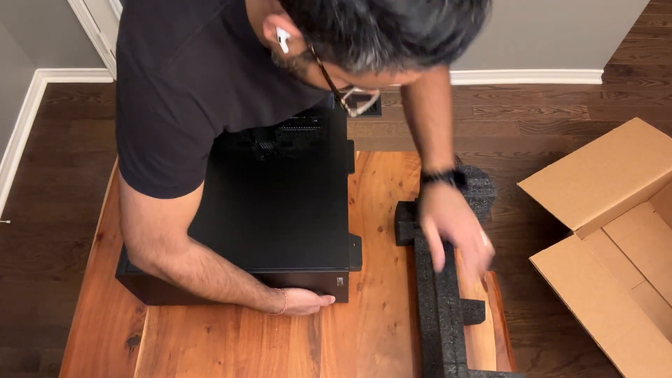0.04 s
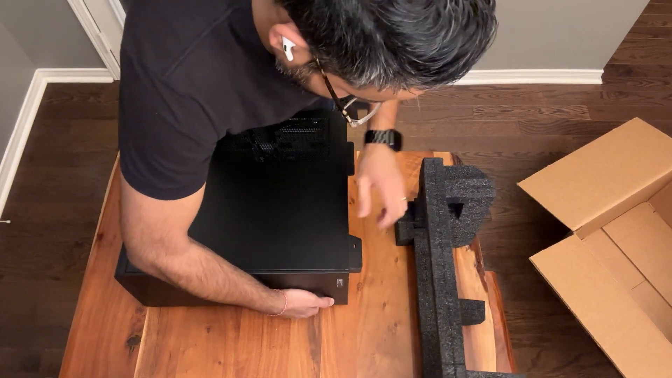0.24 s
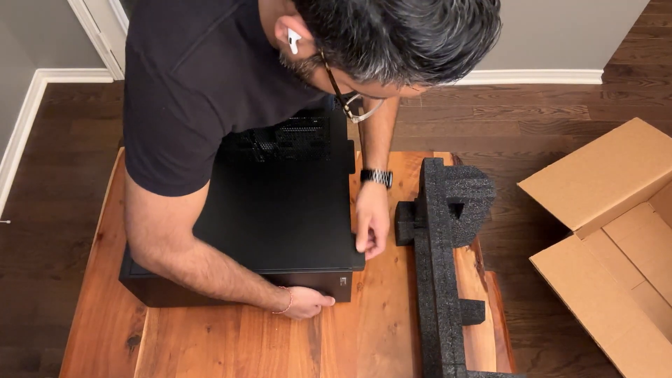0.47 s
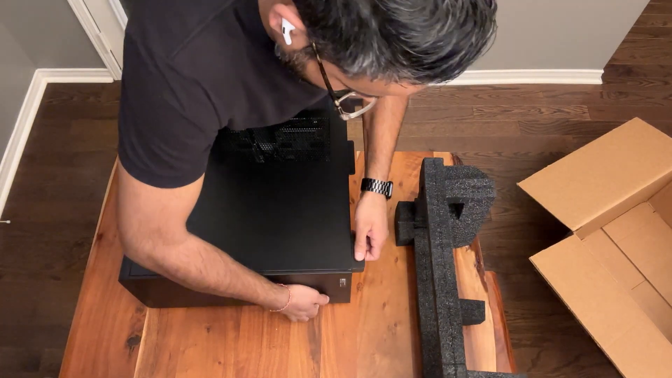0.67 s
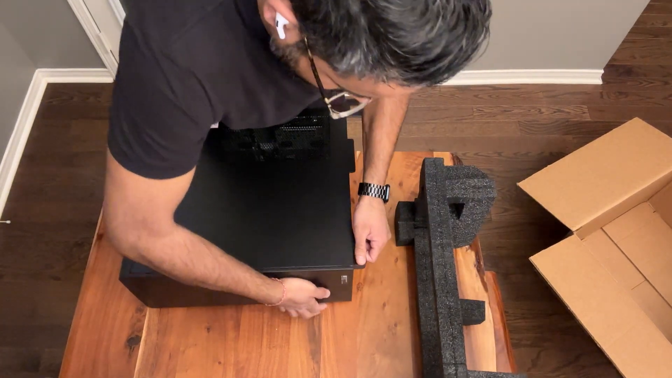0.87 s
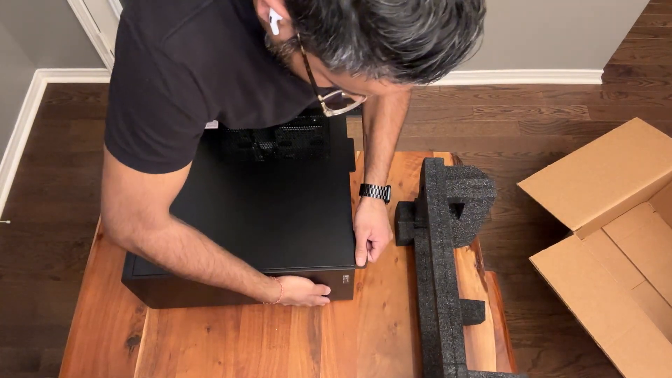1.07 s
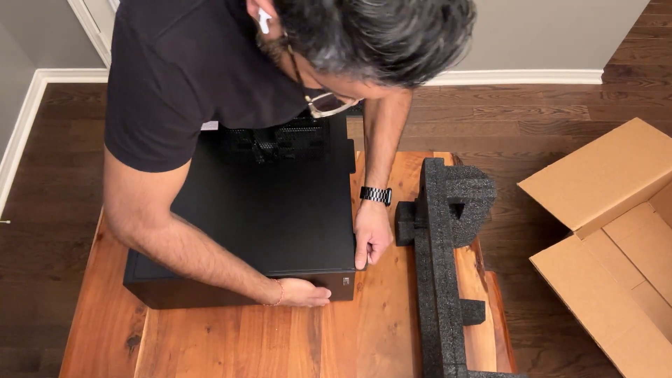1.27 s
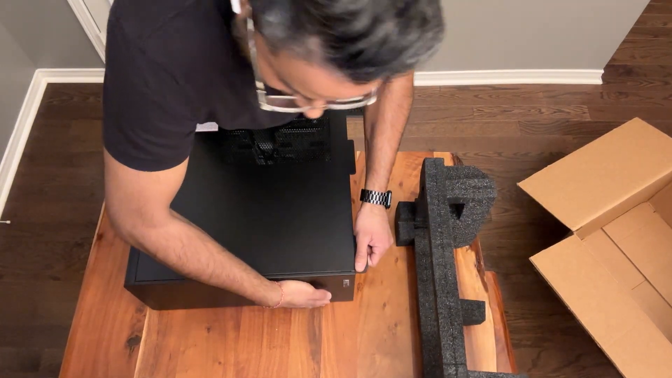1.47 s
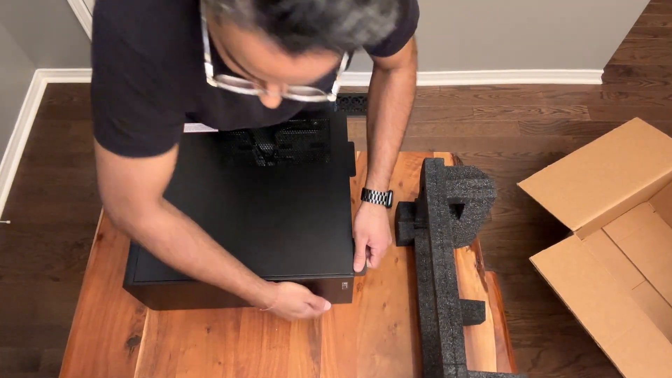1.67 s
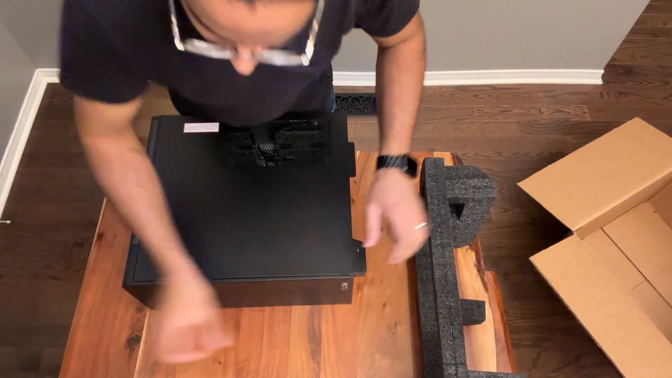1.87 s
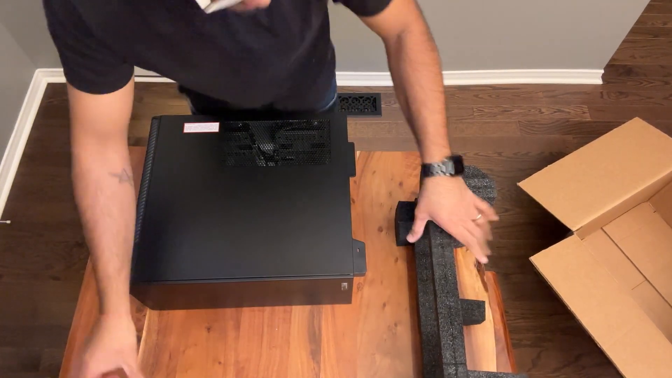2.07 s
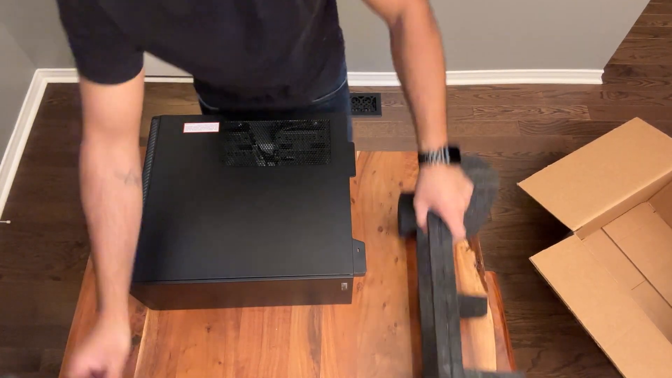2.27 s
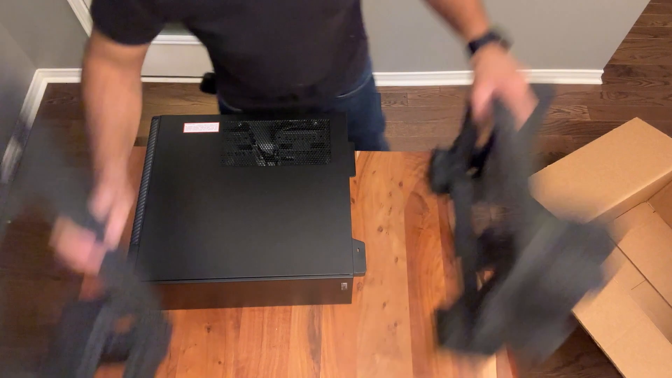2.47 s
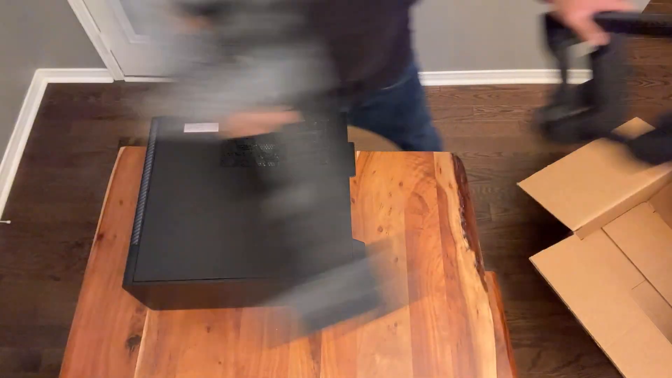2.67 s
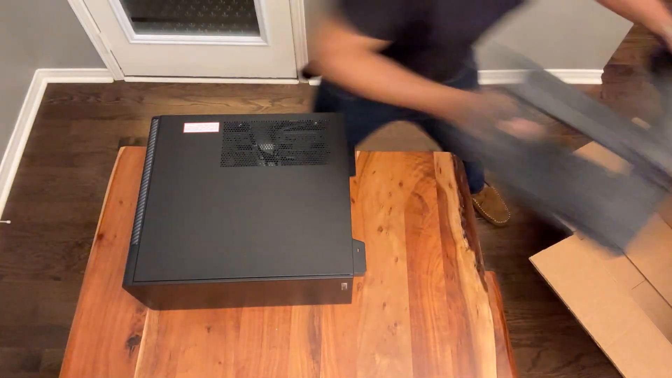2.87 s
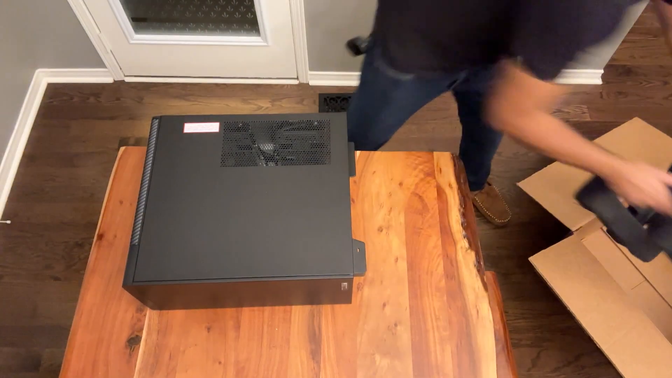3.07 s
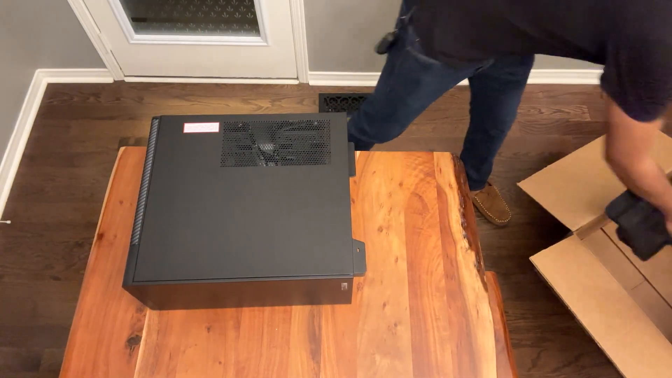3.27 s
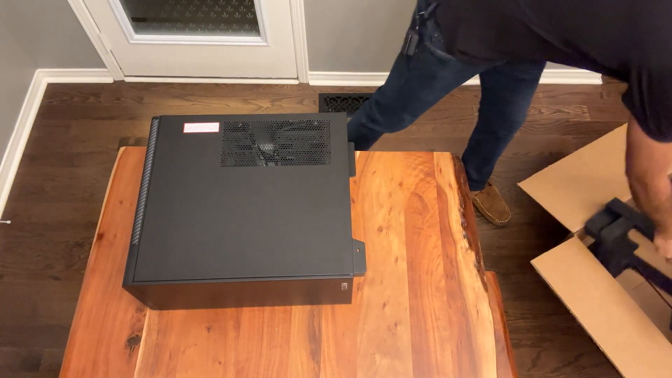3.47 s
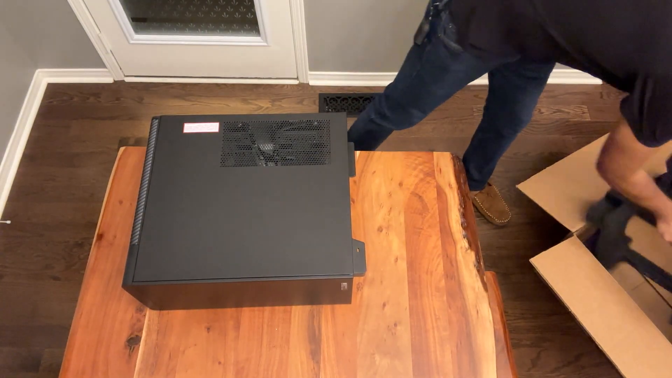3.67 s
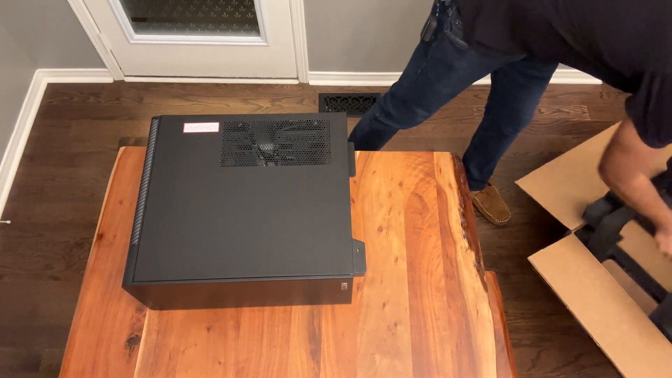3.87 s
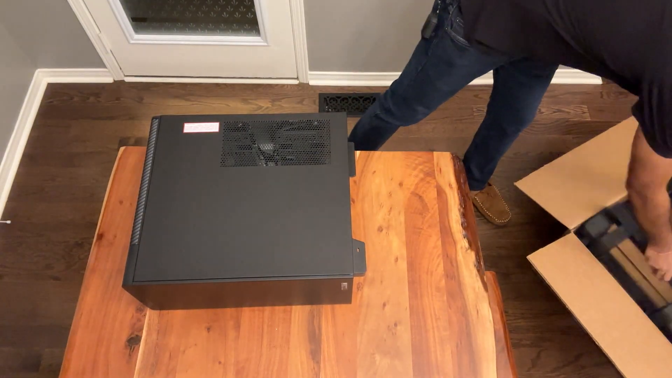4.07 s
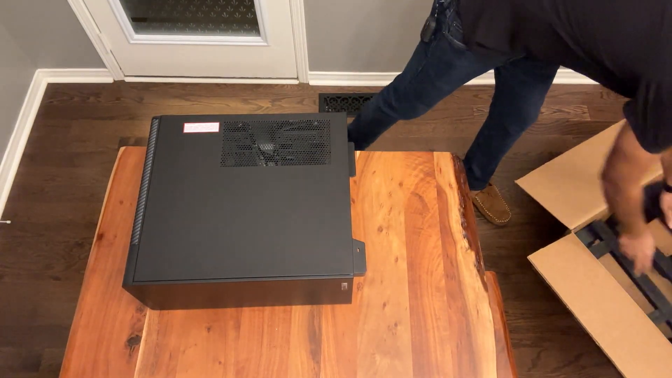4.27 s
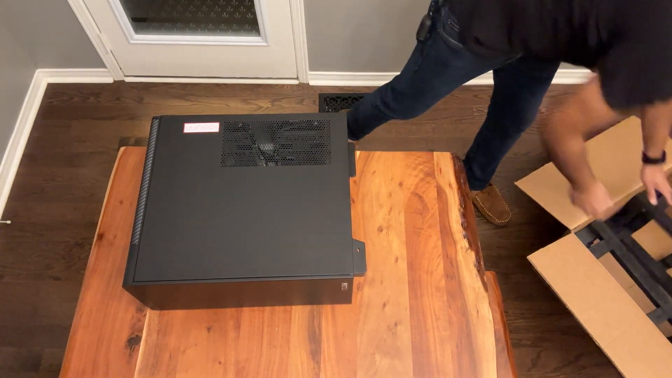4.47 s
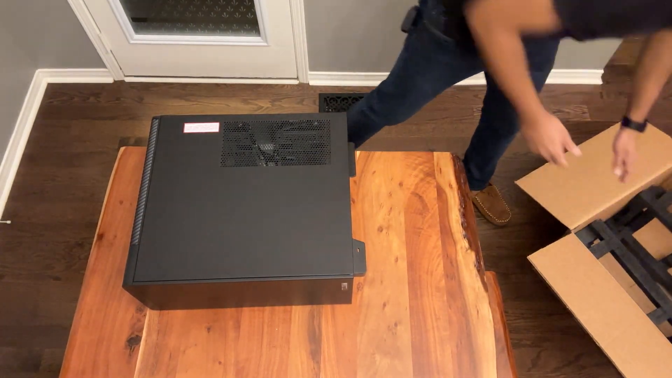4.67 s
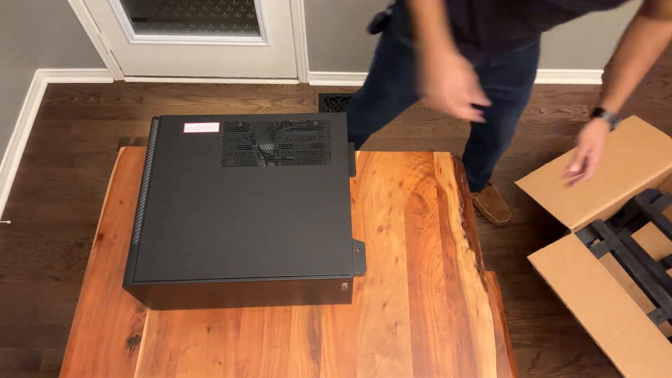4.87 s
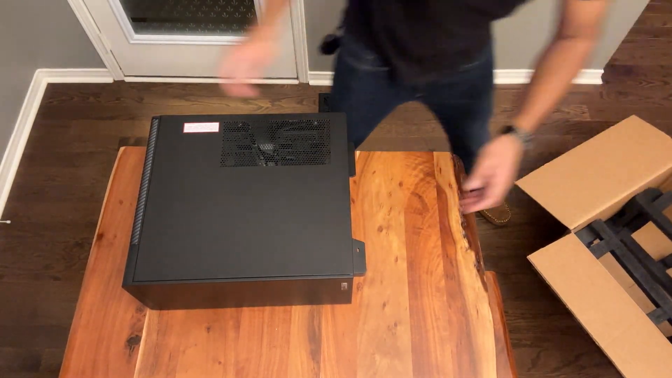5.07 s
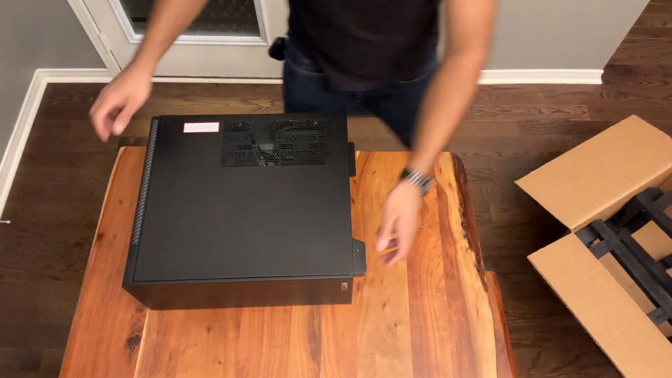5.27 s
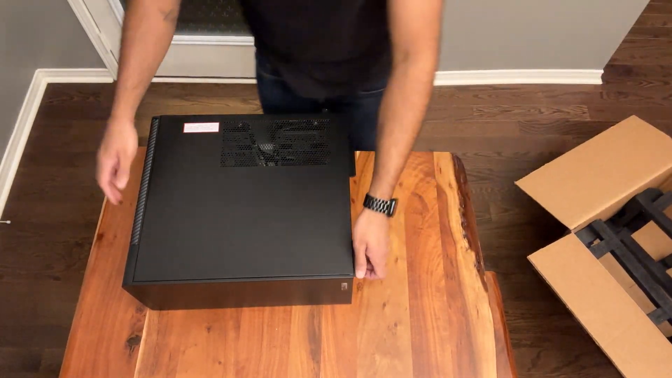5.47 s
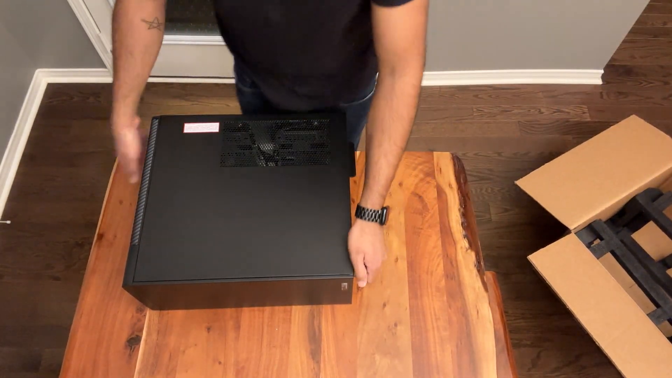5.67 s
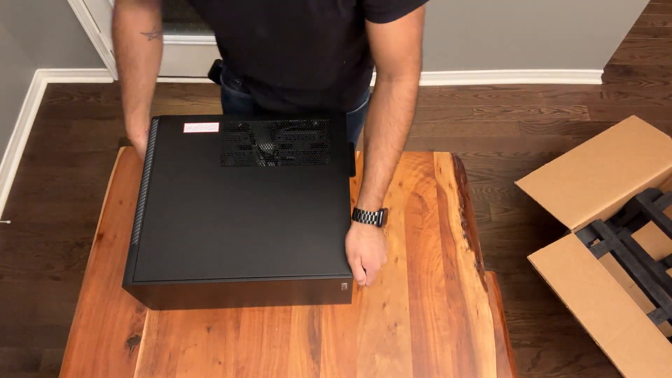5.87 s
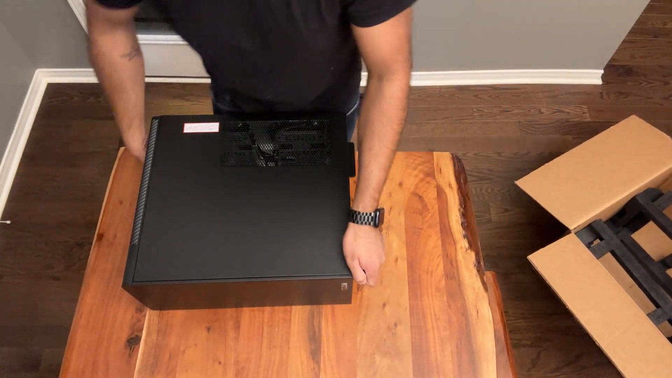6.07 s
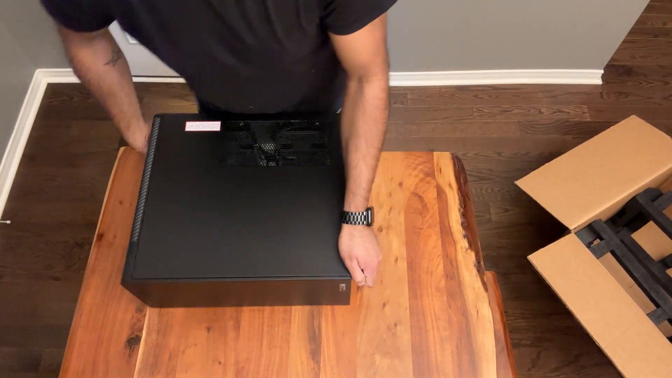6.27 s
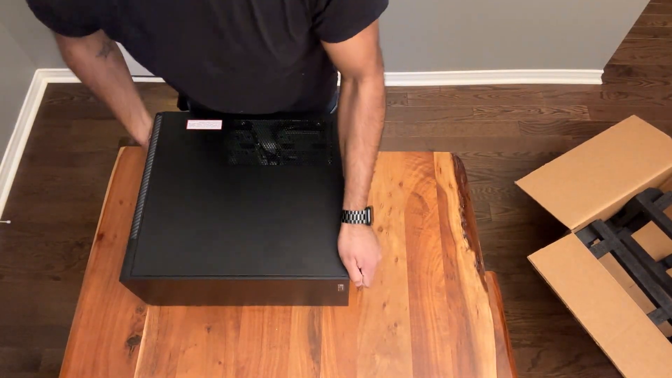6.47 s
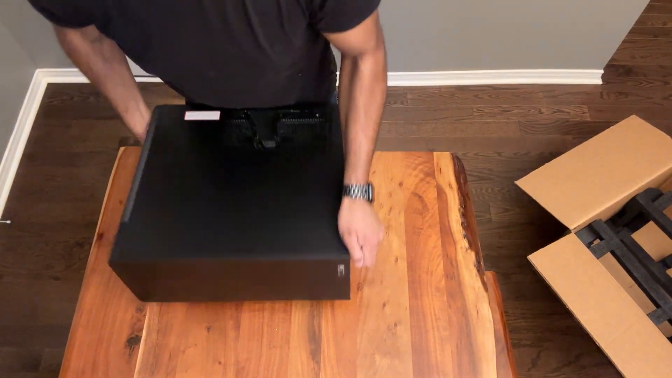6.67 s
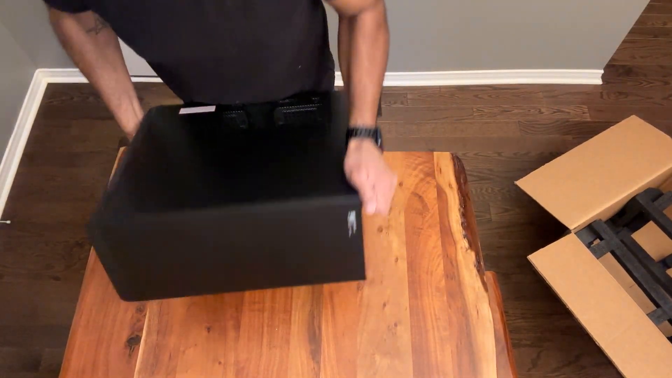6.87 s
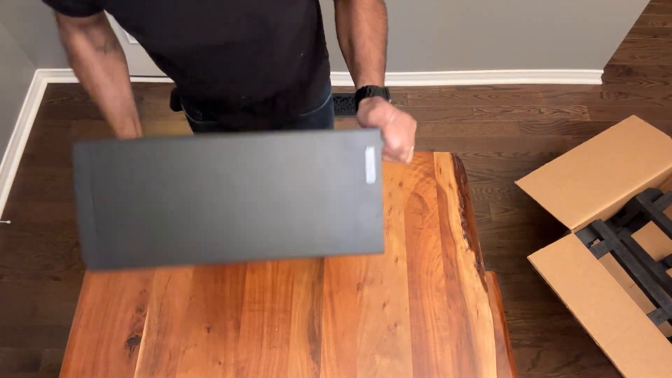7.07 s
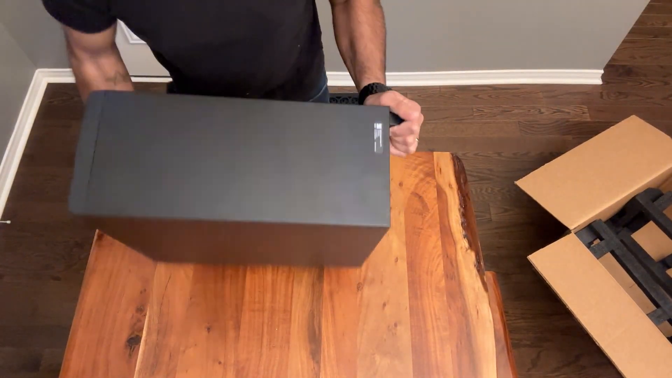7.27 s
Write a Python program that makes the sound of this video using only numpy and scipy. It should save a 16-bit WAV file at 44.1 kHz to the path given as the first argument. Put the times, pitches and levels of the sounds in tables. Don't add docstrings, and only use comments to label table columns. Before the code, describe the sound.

In a small hard room, a steel case thuds softly, foam pieces scrape and bang into a carton, and hands clack quietly on metal.

```python
import sys
import numpy as np
from scipy import signal
from scipy.fft import rfft, irfft, next_fast_len
from scipy.io import wavfile
from scipy.ndimage import uniform_filter1d, map_coordinates

SR = 44100
rng = np.random.default_rng(int(sys.argv[2]) if len(sys.argv) > 2 else 0)


def wav_record(signal):
    frames = np.transpose(np.atleast_2d(signal))
    bounded = np.clip(frames, -1, 1)
    quanta = np.round(bounded * 32767).astype(np.int16)
    wavfile.write(sys.argv[1], SR, quanta)


def field_ratio(decibels):
    return 10 ** (np.asarray(decibels, dtype=float) / 20)


N = 323485

# centre in Hz, width in Hz, level in dB.
FLOOR_MODES = [(56, 10.6, -3.5), (72.5, 11.3, -8.5), (42, 5, -8.5)]


def unit(x):
    return x / np.sqrt(np.mean(x ** 2) + 1e-20)


def peak(x):
    return x / np.abs(x).max()


def along(points, hz):
    f, v = np.transpose(points)
    return np.interp(np.log(hz + 1), np.log(f + 1), v)


def filtered(x, response):
    m = next_fast_len(x.shape[-1] + 4096)
    spectrum = rfft(x, m) * response(np.fft.rfftfreq(m, 1 / SR))
    return irfft(spectrum, m)[..., :x.shape[-1]]


def resonances(modes):
    def response(f):
        total = 0
        for k, (centre, width, db) in enumerate(modes):
            damping = 1j * f * width
            total = total + (-1) ** k * field_ratio(db) * damping / (centre * centre - f * f + damping)
        return total
    return response


def swells(rows):
    s, rise, fall, db = np.transpose(rows)[:4, :, None]
    t = np.arange(0, N + 64, 32) / SR - s
    rise_power = 2.6
    rising = np.sin(np.pi / 2 * np.clip(t / rise, 0, 1)) ** rise_power
    return field_ratio(db) * np.where(t < rise, rising, field_ratio(-20 * (t - rise) / fall))


def summed(envelopes, offsets_db):
    gains = field_ratio(np.asarray(offsets_db))[:, None]
    total = np.sqrt(np.sum((envelopes * gains) ** 2, axis=0))
    return np.interp(np.arange(N) / 32, np.arange(len(total)), total)


def patchy(x, patchy_db, count):
    z = signal.stft(x, nperseg=256)[2]
    field = uniform_filter1d(rng.standard_normal(z.shape), 3, 0)
    field = uniform_filter1d(field, count, 1)
    return signal.istft(z * field_ratio(patchy_db * unit(field)), nperseg=256)[1][:N]


def grit(rate, scatter_db, smooth):
    happens = rng.random(N) < rate / SR
    size = field_ratio(scatter_db * np.minimum(rng.exponential(size=N), 4))
    return unit(happens * rng.standard_normal(N) * size) + smooth * rng.standard_normal(N)


def blows(events, modes, gain_db):
    # centre in Hz, width in Hz, level in dB.
    board = [(106, 24.8, -2), (134.6, 10, -4)]
    boom_share_db, thud_share_db = -2, 1.5
    out, t = np.zeros(N + SR), np.arange(SR // 3) / SR
    for s, db, hard_db, low_db, floor_db in events:
        pushes = rng.standard_normal(len(t)) * np.exp(-t / 0.0084)
        pushes[0] = 40
        struck = [(c, w, level + rng.normal(0, 2)) for c, w, level in modes[1:]]
        softness = np.clip(.4 - hard_db / 7, 0, 5)
        ring = filtered(pushes, lambda f: resonances(struck)(f) / (1 + 1j * f / 300) ** softness)
        total = peak(ring)
        for low_modes, share_db in ((modes[:1], low_db + 8), (FLOOR_MODES, floor_db + boom_share_db),
                                    (board, floor_db + thud_share_db)):
            deep = filtered(pushes, lambda f: resonances(low_modes)(f) / (1 + 1j * f / 200) ** 2)
            total = total + field_ratio(share_db) * peak(deep)
        start = round((s + hard_db / 5000) * SR)
        out[start:][:len(t)] += field_ratio(db + gain_db) * total
    return out[:N]


def case_and_box_blows():
    # time in seconds, peak in dB, hardness in dB, lowest mode in dB re peak, floor in dB re peak.
    case_blows = [(0.238, -24, -17, -8, -8), (0.489, -33, 2, -26, -34), (1.101, -23, -12, -10, -8),
                  (1.39, -32, -20, -9, -5), (1.771, -52.5, -11, -17, -18), (5.047, -38, -13, -16, -8),
                  (5.113, -40.5, -6.5, -13, -1.5), (5.493, -47.5, -13, -30, -6), (5.6, -40.5, -8.5, -17, 1),
                  (5.696, -40.5, -12.5, -20, 2), (5.786, -34.5, -12, -11.5, -35),
                  (6.011, -39.5, 0, -30, -1), (6.629, -31.5, -3, -26, -28),
                  (7.108, -51.5, -6.5, -13.5, -26)]
    box_blows = [(2.229, -41, -14, -14.5, -28), (2.846, -36, -4.5, -11, -7), (2.872, -38, -12, -10.5, 11),
                 (3.355, -40, -12.5, -17, -1), (3.379, -28.5, -30.5, -25, 2), (3.717, -22, -8, -17, -15.5),
                 (3.731, -16, -20, -20.5, -14), (3.757, -24, -18.5, -8.5, -1.5),
                 (3.915, -15, -16, -22, -15), (4.234, -10, -8, -8, -8), (4.281, -18.5, -15.5, -4.5, -16.5),
                 (4.415, -20, -5.5, -17.5, -5.5), (4.451, -21.5, -18, -11, -7)]
    # centre in Hz, width in Hz, level in dB.
    case_modes = [(183, 9.6, 1), (241, 34, -7), (277, 45, -2.5), (376, 43, -4), (463, 72, -6),
                  (544.5, 53, -1), (718, 120, -7.5), (858, 58, -5.5), (996, 170, -10)]
    box_modes = [(180.1, 13.7, -3), (241, 27.6, -13), (392, 28, -10), (447, 25, -12), (495, 40, -11),
                 (600, 50, -10), (690, 40, -7), (791, 40, -8), (904, 60, -8), (1200, 120, -11),
                 (1450, 200, -12), (1800, 300, -14)]
    return blows(case_blows, case_modes, gain_db=-2) + blows(box_blows, box_modes, gain_db=-4.5)


def flexing():
    # time in seconds, peak in dB, mode in Hz, push in seconds.
    flexes = [
        (6.52, -43, 183, 0.045),
        (6.59, -57, 195, 0.031),
        (6.86, -54, 188, 0.019),
        (7.02, -51.5, 208, 0.016),
        (7.21, -53.5, 195.5, 0.023),
    ]
    # time in seconds, peak in dB, mode in Hz, t60 in seconds.
    rings = [(0.24, -39, 183, .6), (0.49, -52, 2200, .04), (1.103, -31, 240, .12), (1.104, -40, 570, .12),
             (1.387, -34, 253, .24), (1.4, -37, 185, .4), (2.85, -58, 250, .5), (3.365, -39, 248, .2),
             (3.362, -48, 598, .08), (3.49, -44, 390, .25), (3.754, -36, 3300, .02),
             (3.894, -38, 2950, .025), (4.236, -30, 610, .1), (4.24, -26, 150, .2), (4.31, -32, 700, .12),
             (4.415, -34, 760, .1), (5.604, -50, 900, .06), (6.2, -60, 1400, .05), (6.6305, -40, 1300, .02),
             (6.897, -48, 1060, .07), (6.898, -58, 1308, .06), (6.897, -56, 2100, .04),
             (6.897, -58, 3800, .03), (7.108, -64, 1520, .04)]
    out, t = np.zeros(N + SR), np.arange(SR // 4) / SR
    rows = [(*r, .11) for r in flexes]
    rows += [(s, db, hz, 1 / hz, t60) for s, db, hz, t60 in rings]
    for s, db, hz, push, t60 in rows:
        rising = np.sin(np.pi / 2 * t / push) ** 2
        swell = np.where(t < push, rising, field_ratio(-60 * (t - push) / max(t60, .01)))
        waver = np.cumsum(rng.standard_normal(len(t))) * hz / 8000
        out[round(s * SR):][:len(t)] += field_ratio(db) * swell * np.sin(2 * np.pi * hz * t + waver)
    return out[:N]


def rubbing():
    # start in seconds, rise in seconds, fall in seconds per 20 dB, strength in dB, brightness in dB.
    hands = [(0, .09, .08, -62, -9), (.235, .025, .07, -61.5, -12), (.465, .03, .08, -61, 1),
             (.57, .055, 0.08, -55, 2), (.68, .04, .14, -61, -6), (.79, .145, .075, -47.5, -2.5),
             (1.1, 0.012, .05, -68, -19), (1.36, .05, .06, -59, -13), (1.66, 0.064, .1, -64, -7),
             (5.04, 0.0088, 0.08, -57, -13), (5.11, 0.016, 0.14, -54.5, -11.5), (5.2, 0.053, .3, -67, -7),
             (5.49, .02, 0.65, -65, -14.5), (5.546, .006, .2, -64, -2), (5.601, .015, .1, -56, -8),
             (5.69, .015, .1, -52, -14), (5.785, .02, .2, -55, -8), (6.01, 0.013, 0.18, -51, -6.5),
             (6.17, .06, .2, -62, -4), (6.3, .04, .07, -66, -9), (6.41, .06, 0.08, -70, -6),
             (6.505, .025, .25, -65, -11), (6.628, .01, 0.15, -51, -15), (6.79, .012, .1, -62, -16),
             (6.835, .01, .03, -75, 6), (7.015, .008, .03, -80, 7), (6.61, .016, .05, -64, -14),
             (6.89, .015, .045, -68, -24), (5.86, .03, .06, -62, 2), (7.105, 0.065, 0.2, -71.5, -8.5)]
    foam = [(2.1, 0.15, 0.23, -53.5, -1.5), (2.137, .004, .1, -68, 0), (3.8, .016, .03, -50, 2),
            (2.43, .04, 0.22, -58.5, -3), (2.6, .16, 0.4, -68, 2), (2.833, .015, .23, -53, -20),
            (2.86, .1, .6, -70, 4), (3.35, .09, .08, -41, -6), (3.484, 0.013, 0.13, -39, 0),
            (3.565, 0.11, 0.08, -41, -1), (3.749, .012, .13, -44, -8), (3.88, .02, .14, -42, -6),
            (3.9, .12, .3, -40, -4), (4.155, 0.013, 0.29, -37, -1), (4.19, 0.042, .12, -34.5, -8.5),
            (4.27, 0.032, 0.0937, -39, -6), (4.38, 0.019, 0.11, -39.5, 0.5),
            (4.43, 0.023, 0.1348, -41.5, -8), (4.62, 0.11, 0.47, -61.5, -15), (4.76, 0.038, 0.15, -60, -7),
            (4.88, .05, .1, -62, -9)]
    # frequency in Hz, level in dB per Hz.
    rasp_colour = [(880, -4.5), (1500, 2), (2480, 1), (3070, 0.5), (4960, -7), (6040, -14), (6500, -23),
                   (14300, -120)]
    fizz_colour = [(2940, -19), (5000, -4), (6040, -2), (7100, -3.5), (9400, 0), (12300, -13), (14600, -6),
                   (15500, -18)]
    body_colour = [(180, -42.5), (300, -16), (382, -5.5), (450, -10), (1030, -13.5), (2200, -23),
                   (2860, -41), (4840, -120)]
    strokes, bright_db = swells(hands + foam), np.transpose(hands + foam)[4]
    body_db = np.repeat([-4.5, -10], [len(hands), len(foam)]) - 0.64 * bright_db
    catch = map_coordinates(rng.standard_normal(N // 100), [np.arange(N) * 40 / SR])
    cells = field_ratio(3.2 * catch) * grit(rate=5000, scatter_db=2.3, smooth=.8)
    rasp = filtered(patchy(cells, patchy_db=2.6, count=4), lambda f: field_ratio(along(rasp_colour, f)))
    fizz = filtered(patchy(cells, patchy_db=1.8, count=3), lambda f: field_ratio(along(fizz_colour, f)))
    hollow = patchy(grit(rate=1500, scatter_db=1.5, smooth=1.2), patchy_db=2.2, count=10)
    body = filtered(hollow, lambda f: field_ratio(along(body_colour, f)))
    return (field_ratio(-2.6) * summed(strokes, 0 * bright_db) * unit(rasp)
            + field_ratio(-.3) * summed(strokes, bright_db) * unit(fizz)
            + summed(strokes, body_db) * unit(body))


def squeaks():
    # start in seconds, length in seconds, pitch in Hz, level in dB.
    squeak_rows = [(0.925, 0.05, 2040, -52), (1.655, 0.072, 1720, -71), (1.76, 0.09, 1500, -71),
                   (1.759, 0.1, 3300, -76), (1.92, 0.047, 1524, -73.5), (2.289, 0.06, 1580, -58),
                   (7.103, 0.019, 1520, -64), (3.44, 0.13, 645, -47), (4.73, .1, 3200, -67),
                   (4.78, .04, 4700, -65), (1.77, .07, 6300, -82), (5.43, .05, 1500, -71)]
    out = np.zeros(N + SR)
    for s, length, hz, db in squeak_rows:
        hiss = rng.standard_normal(SR // 4)[:round(length * SR)]
        tone = unit(filtered(hiss, resonances([(hz, hz / 30, 0)])))
        out[round(s * SR):][:len(hiss)] += field_ratio(db) * np.hanning(len(hiss)) * tone
    return out[:N]


def ticks(rows, crack, top_hz):
    out, t = np.zeros(N + SR), np.arange(SR // 16) / SR
    for s, db, hz, t60, broad_db, dull in rows:
        burst = rng.standard_normal(len(t)) * field_ratio(-60 * t / max(t60, .003)) * (1 - np.exp(-t / .0015))
        burst[SR // 2000] = crack
        spot = resonances([(hz, 0.36 * hz, 0), (3000, 12000, broad_db)])

        def contact(f):
            dulling = (1 + 1j * f / 3000) ** np.clip(dull, 0, 3)
            top = (1 + 1.4j * f / top_hz - (f / top_hz) ** 2) ** 2
            return spot(f) / dulling / top
        out[round(s * SR):][:len(t)] += field_ratio(db - 1.0) * peak(filtered(burst, contact))
    return out[:N]


def case_and_box_ticks():
    # time in seconds, peak in dB, centre in Hz, broad crack in dB re centre, dullness 0-3.
    case_ticks = [(0.237, -45, 902, 0, 1), (0.489, -42, 2200, 3, .1), (1.3865, -50, 960, -2, 1),
                  (5.047, -57, 904, 0, 1), (5.113, -37, 1090, -19.5, .6), (5.4972, -47, 1260, -20, 1),
                  (5.603, -30, 856, -10, .4), (5.697, -32, 2900, -4, .8), (5.7886, -33, 1230, 0, .7),
                  (6.0128, -25, 1010, 3, .5), (6.339, -50, 990, -6, .9), (6.516, -53, 3800, -6.5, 1.1),
                  (6.6295, -24, 1160, -3, 1.4), (6.895, -45, 1150, -4, 2.2), (7.1075, -62, 1480, -6, 1)]
    # time in seconds, peak in dB, centre in Hz, t60 in seconds, broad crack in dB re centre.
    box_ticks = [(2.105, -51, 1280, 0.007, 6), (2.842, -40, 1690, 0.03, -39),
                 (3.35, -45, 2900, 0.027, -5.5), (3.3757, -32, 3240, 0.026, 3),
                 (3.4869, -27, 4200, 0.02, -8.5), (3.7539, -26, 3340, 0.01, -8),
                 (3.8925, -29, 2940, 0.017, -16), (4.1592, -22, 3000, 0.012, 8),
                 (4.2327, -14.5, 890, 0.0097, 13), (4.3854, -23, 3610, 0.017, -6.5)]
    rows = [(s, db, hz, .03, broad_db, dull) for s, db, hz, broad_db, dull in case_ticks]
    rows += [(*r, .83) for r in box_ticks]
    return ticks(rows, crack=2.5, top_hz=8500)


def snaps():
    # time in seconds, peak in dB, centre in Hz, broad crack in dB re centre.
    snap_rows = [(0.33, -45, 10400, -32), (0.4738, -55, 6500, -6), (0.4873, -38, 7000, -12),
                 (0.49, -40, 10000, -20), (0.597, -44, 4000, -6), (0.853, -46, 5000, -4),
                 (1.3962, -52, 2200, -6), (1.4193, -50, 4540, -16), (1.9929, -51, 9470, -30),
                 (2.1051, -52, 12000, -12), (2.139, -46, 6030, -8), (2.2, -52, 12000, -20),
                 (2.2303, -36, 5800, -21.5), (2.24, -40, 9200, -20), (2.272, -42, 10000, -20),
                 (2.38, -52, 10000, -10), (2.446, -45, 7600, -11), (2.647, -52, 6800, -25),
                 (2.678, -50, 11000, -20), (2.741, -46, 7500, -25), (2.7533, -42, 8300, -14),
                 (2.765, -41, 8200, -22), (2.78, -44, 3800, -20), (2.826, -50, 10000, -25),
                 (3.4869, -26, 10000, -8), (3.8158, -32, 10000, -6), (3.8945, -32, 9000, -8),
                 (3.9394, -36, 3400, -8), (4.3844, -32, 9700, -8), (4.8953, -55, 9000, -2),
                 (4.98, -60, 12000, -10), (5.549, -44, 8000, -10), (5.9766, -48, 3770, -5),
                 (5.977, -52, 8000, -20), (6.0135, -36, 8500, -10), (6.32, -56, 9000, -20),
                 (6.6295, -36, 6300, -12), (6.63, -44, 10000, -20), (6.798, -48, 2000, -6),
                 (6.846, -55, 7500, -25), (7.0218, -57, 6500, -24)]
    rows = [(s, db, hz, .007, broad_db, .1) for s, db, hz, broad_db in snap_rows]
    return field_ratio(3) * ticks(rows, crack=3, top_hz=16000)


def weight():
    # start in seconds, rise in seconds,
    # fall in seconds per 20 dB, floor boom in dB, panel hum in dB re boom.
    load_rows = [(0, 0.11, 0.5, -44.5, -9), (.3, .1, 0.46, -47, 0), (.55, 0.097, 0.4, -44.5, -5.5),
                 (1.06, .12, .25, -40, -16), (1.36, 0.077, .3, -42, -10), (1.68, 0.073, 0, -51.5, 0.5),
                 (2.08, .17, .25, -51, -12), (2.8, .18, .27, -38, -22), (3.34, .08, .35, -30, -7),
                 (3.68, 0.11, .4, -33, -3), (4.0, 0.11, 0.32, -33.5, -0.5), (4.18, .05, 0.33, -28, 0),
                 (4.4, .13, .12, -35, 0), (4.62, 0.11, .5, -50.5, -5.5), (5.02, .12, .9, -45, -16),
                 (5.6, .15, 0.4, -46, 3), (6.0, 0.093, .25, -41.5, -12), (6.3, 0.091, 1.2, -62, 5.5),
                 (7.0, .1, .5, -69, 4)]
    # centre in Hz, width in Hz, level in dB.
    panel_modes = [(108, 39, -6.5), (196, 27, -2), (233.7, 26, -3.5), (326, 50, -15)]
    loads, hum_db = swells(load_rows), np.transpose(load_rows)[4]
    boom = filtered(rng.standard_normal(N), lambda f: resonances(FLOOR_MODES)(f) / (1 + (f / 110) ** 4))
    creak = grit(rate=150, scatter_db=1.5, smooth=1.5)
    hum = filtered(creak, lambda f: resonances(panel_modes)(f) / (1 + (f / 400) ** 4))
    return field_ratio(-2.5) * summed(loads, 0 * hum_db) * unit(boom) + field_ratio(-6.0) * summed(loads, hum_db) * unit(hum)


def ports(x):
    # time in seconds, lag of the left port in samples, left over right in dB.
    place = [(0, 2.5, 1.5), (1.9, 1.5, -2), (2.3, 6.5, -3.5), (2.7, -14.5, -2.5), (2.95, 13, -2.5),
             (4.9, 13.5, -2.2), (5.1, -9, -1), (5.6, -4, -1.5), (6.1, -10, -1.5), (7.3, 2, -1)]
    s, *columns = np.transpose(place)
    lag, pan_db = [np.interp(np.arange(N) / SR, s, column) for column in columns]
    low = filtered(x, lambda f: 1 / (1 + (f / 250) ** 2))
    sides = []
    for k in (1, -1):
        shaded = low + field_ratio(k * pan_db / 2) * (x - low)
        sides.append(map_coordinates(shaded, [np.arange(N) - k * lag / 2]))
    return np.array(sides)


def diffuse(noise):
    # frequency in Hz, side re mid in dB.
    width = [(60, -11), (125, -8), (250, -4), (500, -1.3), (1300, -0.5), (4400, -0.5), (7500, 0),
             (15000, -3)]

    def mid_and_side(f):
        side_db = along(width, f)
        return np.array([np.ones_like(f), field_ratio(side_db)]) / np.sqrt(1 + field_ratio(2 * side_db))
    mid, side = filtered(noise, mid_and_side)
    return np.array([mid + side, mid - side])


def room(x, step=SR // 5):
    # frequency in Hz, t60 in seconds.
    decay = [(60, 1), (160, 0.36), (420, 0.36), (1100, 0.39), (3000, 0.37), (8000, 0.26), (14000, 0.07)]
    out, fade = np.zeros((2, N + 2 * SR)), np.hanning(2 * step + 1)[:-1]
    padded = np.pad(x, (step, 2 * step))
    for start in range(0, N + step, step):
        hz, t, z = signal.stft(rng.standard_normal((2, SR // 2)), SR, nperseg=512)
        tail = signal.istft(z * field_ratio(-60 * t / along(decay, hz)[:, None]), SR, nperseg=512)[1]
        piece = padded[start:start + 2 * step] * fade
        wet = signal.fftconvolve(piece[None], tail / np.linalg.norm(tail[0]), axes=1)
        out[:, start:start + wet.shape[1]] += wet
    return diffuse(np.pad(out[:, step:], ((0, 0), (70, 0)))[:, :N])


def room_tone():
    # frequency in Hz, level in dB per Hz.
    air_colour = [(18, -20), (45, -3), (511, -15.5), (928, -27), (1560, -21.5), (3000, -39), (10500, -43),
                  (13000, -70)]
    air = filtered(rng.standard_normal((2, N)), lambda f: field_ratio(along(air_colour, f)))
    return diffuse(field_ratio(-67.5) * unit(air))


def treble_from_one_port(x):
    # frequency in Hz, share of the one port 0-1, lead of the right side in radians.
    one_port = np.array([(6000, 0, 2.6), (7600, .6, 2.2), (9000, .8, 1.2), (10200, 1, 0), (12000, 1, 0),
                         (13200, .85, -1.3), (14200, .85, -2.2), (15000, .9, -2.6)])

    def share(f):
        return along(one_port[:, [0, 1]], f)

    def turn(f):
        return along(one_port[:, [0, 2]], f)
    left = filtered(x[0], lambda f: 1 - share(f) + share(f) * np.exp(-.5j * turn(f)))
    right = filtered(x, lambda f: [np.sqrt(share(f)) * np.exp(.5j * turn(f)), np.sqrt(1 - share(f))])
    return np.array([left, right.sum(axis=0)])


def scene():
    knocks = case_and_box_blows() + flexing()
    rub = rubbing() + squeaks()
    tick = case_and_box_ticks()
    snap = snaps()
    direct = ports(knocks + rub + tick + snap + weight())
    wet = field_ratio(5) * filtered(knocks, lambda f: (1j * f / (170 + 1j * f)) ** 2)
    wet = wet + field_ratio(0.7) * rub + field_ratio(1.5) * tick + field_ratio(-10) * snap
    return direct + room(wet) + room_tone()


def top_cut(x):
    return signal.sosfilt(signal.butter(12, 15700, fs=SR, output="sos"), x)


def record(dry):
    heard = treble_from_one_port(dry)
    mix = filtered(heard, lambda f: (1j * f / (33 + 1j * f)) ** 3 / (1 + (f / 15700) ** 16))
    return top_cut(mix)


dry = scene()
out = record(dry)
wav_record(out)
```